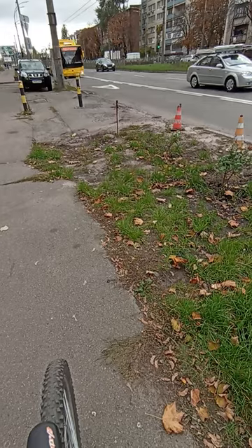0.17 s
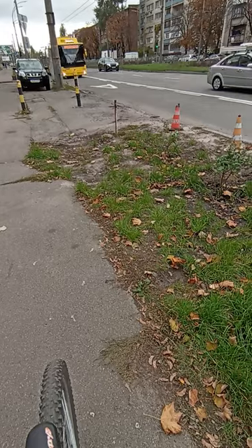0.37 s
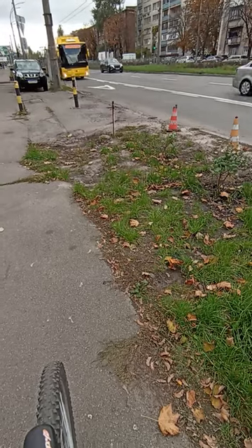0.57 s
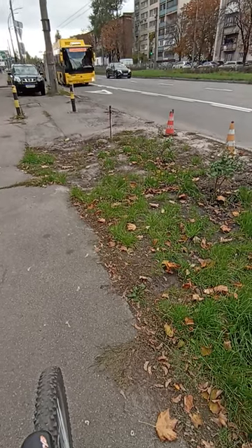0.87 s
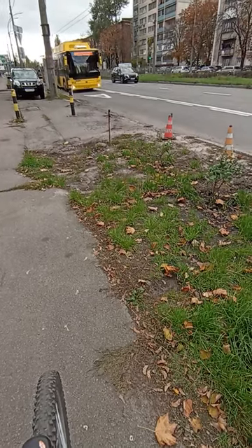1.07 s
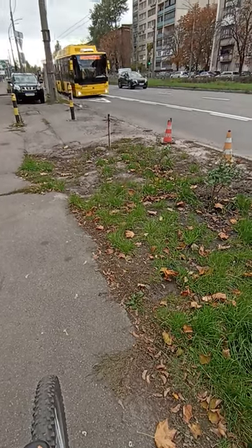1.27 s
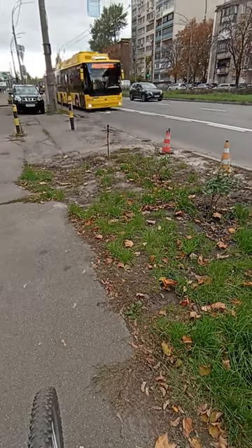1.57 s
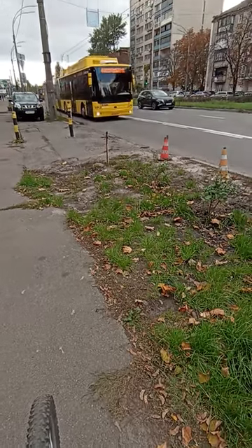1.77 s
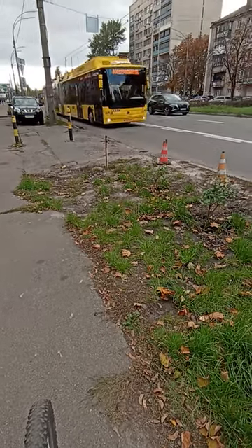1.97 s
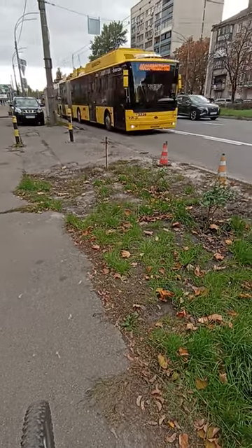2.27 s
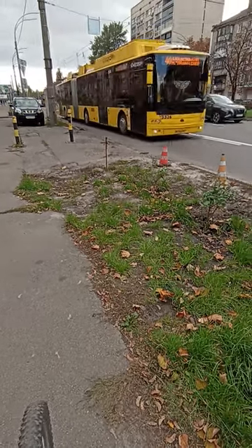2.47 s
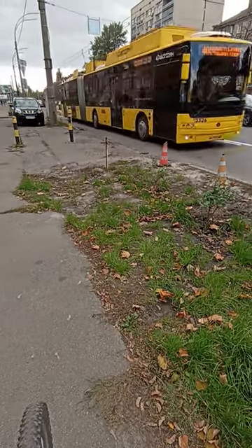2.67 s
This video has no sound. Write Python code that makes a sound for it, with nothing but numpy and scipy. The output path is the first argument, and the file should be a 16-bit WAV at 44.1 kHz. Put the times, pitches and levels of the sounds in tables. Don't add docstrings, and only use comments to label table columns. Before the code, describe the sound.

A trolleybus rumbles closer on a city street, tyres roaring and body droning, with a faint inverter whine; a car hums and hisses nearby, while the close stereo microphone on a bicycle catches ticks and snapping grit.

```python
import sys
import numpy as np
from scipy import signal
from scipy.fft import rfft, irfft, next_fast_len
from scipy.io import wavfile
from scipy.ndimage import uniform_filter1d, map_coordinates

SR = 44100
rng = np.random.default_rng(int(sys.argv[2]) if len(sys.argv) > 2 else 0)


def nominal_scale(level):
    x = np.asarray(level, float) / 20
    return 10 ** x


def file_out(sig):
    cols = np.atleast_2d(sig).T
    lim = np.clip(cols, -1, 1)
    pcm = np.round(lim * 32767).astype(np.int16)
    wavfile.write(sys.argv[1], SR, pcm)


N = 123921

# time in seconds, nearness in dB.
BUS_NEARNESS = [(.35, -29), (.9, -28.5), (1.1, -28.5), (1.4, -27.5), (1.65, -26), (1.85, -26), (2, -27),
                (2.15, -25), (2.45, -24.5), (2.7, -25), (2.81, -24)]
# frequency in Hz, density in dB per Hz.
BUS_TYRE_COLOUR = [(400, -2.5), (600, -6), (860, 0.5), (1000, -2.5), (1230, -7.5), (1600, -9),
                   (2200, -17.5), (3100, -29.5)]
# frequency in Hz, density in dB per Hz.
RUMBLE_COLOUR = [(13, -73), (22, -32), (43, -23.5), (51, -32), (64, -6.5), (190, -2), (316, -1),
                 (700, -18.5), (910, -57), (1540, -120)]
# middle in seconds, length in seconds, pitch in Hz, level in dB.
PANEL_DRONES = [(.75, .8, 151, -39), (.45, .6, 220, -39), (1.2, .5, 228, -40), (1.75, .3, 228, -39),
                (.9, .4, 255, -39), (1.7, .5, 198, -39), (2.17, .35, 202, -32), (2.15, .3, 322, -28),
                (2.33, .25, 304, -28), (2.3, .25, 390, -33), (2.6, .3, 250, -31), (2.7, .2, 278, -31),
                (1.35, .2, 145, -36), (.7, .2, 240, -35), (1, .25, 290, -37), (2.55, .4, 146, -36),
                (2.78, .2, 120, -33), (1.85, .3, 427, -39), (2.2, .2, 260, -35), (1, .2, 160, -36),
                (1.86, .15, 150, -34), (.72, .12, 150, -35), (2.7, .3, 385, -36), (2.75, .25, 198, -34)]
# time in seconds, level in dB.
WHINE_LEVEL = [(.3, -65), (1.2, -58), (1.3, -53), (1.42, -51.5), (1.52, -53.5), (1.6, -58), (1.72, -53.5),
               (1.88, -57), (1.97, -55), (2.15, -53.5), (2.3, -62), (2.42, -51), (2.5, -62), (2.81, -54)]
# frequency in Hz, density in dB per Hz.
WHINE_COLOUR = [(3150, -25), (3320, -1), (3550, -5.5), (3720, -16)]
# time in seconds, firing rate in Hz, level in dB.
ENGINE_RUN = [(.12, 65.3, -42), (.3, 65.86, -54), (.6, 66.7, -48), (.9, 68.1, -37), (1.1, 69.06, -45),
              (1.35, 71.8, -35), (1.5, 72.64, -44), (1.6, 73.8, -37.5), (1.68, 73.8, -40),
              (1.8, 75.07, -32), (1.97, 75.5, -39), (2.03, 75, -60), (2.15, 75.4, -52), (2.6, 78.2, -49),
              (2.81, 79.3, -32)]
# multiple of the rate, level in dB.
FIRING_ORDERS = [
    (1, 0),
    (2, -13),
    (3, -12),
]
# time in seconds, level in dB.
CAR_HISS_LEVEL = [
    (.3, -45),
    (.5, -45.5),
    (1, -46.5),
    (1.35, -51),
    (1.8, -51),
    (2.1, -49),
    (2.4, -46.5),
    (2.81, -46.5),
]
# frequency in Hz, density in dB per Hz.
CAR_HISS_COLOUR = [(450, -2), (860, 10.5), (1100, 5), (1700, -7), (2300, 3.5), (2900, -1), (3600, -6.5),
                   (3750, -31)]
# time in seconds, level in dB.
ROLL_LEVEL = [
    (.35, -61),
    (.9, -59),
    (1.1, -60),
    (1.45, -62),
    (1.9, -59),
    (2.2, -61),
    (2.81, -58),
]
# frequency in Hz, density in dB per Hz.
ROLL_LOW_COLOUR = [(2180, -41), (3700, -2.5), (4040, -2.5), (5840, -8.5), (6620, -8), (7200, -22),
                   (9360, -32), (15800, -120)]
# frequency in Hz, density in dB per Hz.
ROLL_HIGH_COLOUR = [(6800, -2.5), (8800, -6.5), (9300, -4.5), (11400, -9.5), (11700, -0.5), (13000, -3),
                    (15700, -9.5)]
# start in seconds, peak level in dB.
PAWL_TICKS = [(0.1141, -57), (0.2149, -68), (0.3092, -58), (0.4045, -60), (0.5044, -62), (0.608, -62),
              (0.7173, -53), (0.8086, -56), (0.9193, -62), (1.0131, -58), (1.1169, -55), (1.2206, -62),
              (1.3249, -61), (1.4282, -60), (1.5354, -61), (1.6347, -54), (1.7434, -62), (1.8462, -54),
              (1.9544, -66), (2.0662, -61), (2.1715, -60), (2.2822, -62), (2.393, -56), (2.7157, -61)]
# blow in seconds, peak in dB, centre in Hz, width in octaves.
GRIT_SNAPS = [(.6594, -44, 12000, 0.24), (.8325, -37, 12500, 0.36), (.975, -46, 12000, .2),
              (1.51, -51, 13000, .15), (2.05, -62, 13920, .15), (.878, -38, 6800, 0.35),
              (.9732, -41, 7300, 0.2), (1.0944, -39, 3900, .4), (1.035, -44, 5800, .3),
              (2.76, -39, 6300, .12), (1.121, -45, 6037, .3), (1.271, -41.5, 7550, 0.16),
              (1.5521, -47, 6200, .9), (1.581, -50, 13000, 0.3), (1.9094, -53, 8300, 0.24),
              (0.93, -40, 5300, .3), (1.915, -57, 8500, .3), (1.615, -56, 9400, .1),
              (2.361, -43, 11700, 0.18), (2.3648, -33.5, 5300, 0.38), (2.5025, -41, 5970, 0.23),
              (2.565, -43, 11990, 0.45), (2.7606, -34, 8000, 0.85), (2.7764, -35, 6300, 0.47)]
# blow in seconds, peak in dB, centre in Hz, width in octaves.
STONE_SNAPS = [(1.5812, -26, 2250, .3), (1.5936, -22, 1300, .6), (1.8045, -22, 1250, .4),
               (1.8048, -36, 4700, .2), (1.8085, -18, 750, .6), (1.8187, -15, 1100, .8),
               (1.8191, -26, 3200, .4), (1.8194, -34, 5700, .3), (2.057, -27, 2600, .45),
               (2.066, -36, 5000, .3), (2.3503, -30, 2100, .4), (.388, -19, 900, .6),
               (1.553, -39, 4500, .5)]
# blow in seconds, peak in dB, centre in Hz, width in octaves.
UNDER_SNAPS = [
    (1.5812, -23, 2350, .3),
    (1.5936, -22, 1400, .5),
    (1.8085, -19, 800, .6),
    (1.8189, -26, 2200, .6),
    (2.057, -32, 2500, .4),
]
# frequency in Hz, lead in radians.
LEFT_LEAD = [(520, 0.25), (860, 1.12), (1380, 2.25), (2070, 2.23), (2600, 4.05), (3800, 7.2), (6200, 14.36)]
# frequency in Hz, likeness from 0 to 1.
PORT_LIKENESS = [(120, .997), (350, 1), (690, 0.7), (1030, 0.75), (1700, 0.62), (2600, 0.6), (4500, 0.38),
                 (9000, 0.3)]
# frequency in Hz, left over right in dB.
PORT_BALANCE = [(100, 0.84), (560, -5), (860, -3), (2400, -2), (5600, 0), (9000, 5), (11300, 22.5),
                (11700, 14.5), (15500, 8)]
# start in seconds, end in seconds.
TOP_GAPS = [
    (1.74, 1.77),
    (1.97, 2.05),
    (2.71, 2.74),
]


def unit(x):
    return x / np.sqrt(np.mean(x ** 2) + 1e-20)


def along(points, hz):
    f, v = np.transpose(points)
    return np.interp(np.log(hz + 1), np.log(f + 1), v)


def closed(colour):
    return [(colour[0][0] * .7, -90), *colour, (colour[-1][0] * 1.4, -90)]


def curves(rows):
    s, *cols = np.transpose(rows)
    return [np.interp(np.arange(N) / SR, s, c) for c in cols]


def wobble(rate):
    return map_coordinates(rng.standard_normal(int(N * rate / SR) + 4), [np.arange(N) * rate / SR])


def filtered(x, response):
    m = next_fast_len(N + SR // 2)
    return irfft(rfft(x, m) * response(np.fft.rfftfreq(m, 1 / SR)), m)[..., :N]


def direct(x):
    return np.array([x, 0 * x])


def rush(colour, patchy_db):
    z = signal.stft(rng.standard_normal((2, N)), nperseg=512)[2]
    patches = uniform_filter1d(rng.standard_normal(z.shape[1:]), size=6, axis=0)
    patches = unit(uniform_filter1d(patches, size=12, axis=1))
    pair = signal.istft(z * nominal_scale(patchy_db * patches), nperseg=512)[1][:, :N]
    return unit(filtered(pair, lambda hz: nominal_scale(along(colour, hz))))


def bus_level(grows, offset_db):
    near_db, = curves(BUS_NEARNESS)
    mean_db = near_db.mean()
    return mean_db + grows * (near_db - mean_db) + offset_db


def bus_tyres():
    level_db = bus_level(grows=0.98, offset_db=-3) + 0.73 * wobble(18)
    return nominal_scale(level_db) * rush(closed(BUS_TYRE_COLOUR), patchy_db=0.35)


def bus_rumble():
    return nominal_scale(bus_level(grows=0.76, offset_db=-1.5)) * rush(closed(RUMBLE_COLOUR), patchy_db=.6)


def bus_panels():
    t, drones = np.arange(N) / SR, np.zeros(N)
    for middle, length, hz, db in PANEL_DRONES:
        level = nominal_scale(db + 2 * wobble(13))
        swell = np.exp(-(2 * (t - middle) / length) ** 2)
        phase = 2 * np.pi * np.cumsum(hz + 3 * wobble(15)) / SR
        drones += level * swell * np.sin(phase)
    return direct(drones)


def bus_inverter():
    level_db, = curves(WHINE_LEVEL)
    return nominal_scale(level_db + .8 * wobble(20)) * rush(closed(WHINE_COLOUR), patchy_db=1)


def car_engine():
    firing_hz, level_db = curves(ENGINE_RUN)
    turn = 2 * np.pi * np.cumsum(firing_hz * (1 + 0.02 * wobble(12.23))) / SR
    hum = np.zeros(N)
    for multiple, db in FIRING_ORDERS:
        hum += nominal_scale(level_db + 3.1 + db + 1.8 * wobble(6)) * np.sin(multiple * turn)
    return direct(hum)


def car_tyres():
    level_db, = curves(CAR_HISS_LEVEL)
    return nominal_scale(level_db + 6.5 + 0.82 * wobble(18)) * rush(closed(CAR_HISS_COLOUR), patchy_db=-0.35)


def bicycle_tyres():
    level_db = curves(ROLL_LEVEL)[0] + 0.6 * wobble(17.45)
    low = nominal_scale(4) * rush(closed(ROLL_LOW_COLOUR), patchy_db=1)
    high = nominal_scale(-3) * rush(closed(ROLL_HIGH_COLOUR), patchy_db=1)
    return nominal_scale(level_db) * (low + high)


def freewheel():
    pawl, t = np.zeros(N + SR), np.arange(2000) / SR
    t60, rise_s, bounce_s = 0.031, 0.00078, .005
    for s, db in PAWL_TICKS:
        hz = 9620 - 190 * s + 70 * rng.standard_normal()
        ring = nominal_scale(db + 3.5 - 60 * t / t60) * (1 - np.exp(-t / rise_s)) * np.sin(2 * np.pi * hz * t)
        bounce = bounce_s * rng.uniform(0.56, 2), -2.5 + 1.7 * rng.standard_normal()
        for delay, gain_db in [(0, -1.5), bounce]:
            pawl[round((s + delay) * SR):][:len(t)] += nominal_scale(gain_db) * ring
    return np.array([pawl[:N], 0.9 * pawl[:N]])


def snaps(rows, t60):
    size, rise_s = 2048, .003
    out = np.zeros((2, N + size))
    t, hz = np.arange(size) / SR - rise_s, np.fft.rfftfreq(size, 1 / SR)
    for s, db, centre_hz, octaves in rows:
        burst = rng.standard_normal((2, size)) * nominal_scale(-60 * abs(t) / np.where(t > 0, t60, rise_s))
        burst[:, np.argmin(abs(t))] = 14
        band = np.exp(-(np.log2((hz + 1) / centre_hz) / max(octaves, .1)) ** 2)
        burst = irfft(rfft(burst) * band)
        out[:, round((s - rise_s) * SR):][:, :size] += nominal_scale(db) * burst / abs(burst).max() * [[1], [.4]]
    return out[:, :N]


def ports(sound, extra):
    def spread(hz):
        return np.arccos(np.clip(along(PORT_LIKENESS, hz), -1, 1)) / 2

    def half_difference(hz):
        lead = along([(250, 0), *LEFT_LEAD], hz)
        nepers = along(PORT_BALANCE, hz) * np.log(10) / 20
        return nepers / 2 + .5j * (lead + extra * np.tanh(lead))

    a, b = filtered(sound, lambda hz: np.array([np.cos(spread(hz)), np.sin(spread(hz))]))
    pair = np.array([a + b, a - b])
    return filtered(pair, lambda hz: np.exp([half_difference(hz), -half_difference(hz)]))


def scene():
    bus = bus_tyres() + bus_rumble() + bus_panels() + bus_inverter()
    bicycle = bicycle_tyres() + freewheel() + snaps(GRIT_SNAPS, t60=0.019) + snaps(STONE_SNAPS, t60=0.019)
    cars = car_engine() + car_tyres()
    below = snaps(UNDER_SNAPS, t60=.012)[0]
    return ports(bus + bicycle, extra=0) + ports(cars, extra=1) + below


def thinned(x):
    band_hz, whim_db, shares = 220, 11, (.03, .17)
    hz, t, z = signal.stft(x, SR, nperseg=1024, noverlap=768)
    which = (hz // band_hz).astype(int)
    member = 1. * (which[:, None] == np.arange(which[-1] + 1))
    power = np.einsum("cft,fb->cbt", abs(z) ** 2, member)
    whim = uniform_filter1d(rng.standard_normal(power.shape), size=9, axis=2)
    power = uniform_filter1d(power, size=4, axis=2) * nominal_scale(2 * whim_db * whim)
    power = power[:, which]
    treble = (hz > 6900) & (hz < 15700)
    floor = np.array([np.quantile(p[treble], share) for p, share in zip(power, shares)])
    lost = (power < floor[:, None, None]) & treble[:, None]
    in_gap = np.any([(t > a) & (t < b) for a, b in TOP_GAPS], axis=0)
    lost |= (hz > 15200)[:, None] & in_gap
    return signal.istft(z * ~lost, SR, nperseg=1024, noverlap=768)[1][:, :N]


def band_limit(x):
    return signal.sosfilt(signal.butter(12, 15680, fs=SR, output="sos"), x)


def record(dry):
    t = np.arange(N) / SR - 0.079
    step = 0.25 * np.clip(t / 0.028, 0, 1)
    rise = 0.75 * np.clip(t / 0.28, 0, 1) ** 0.86
    return band_limit(thinned(dry) * (step + rise))


dry = scene()
out = record(dry)
file_out(out)
```